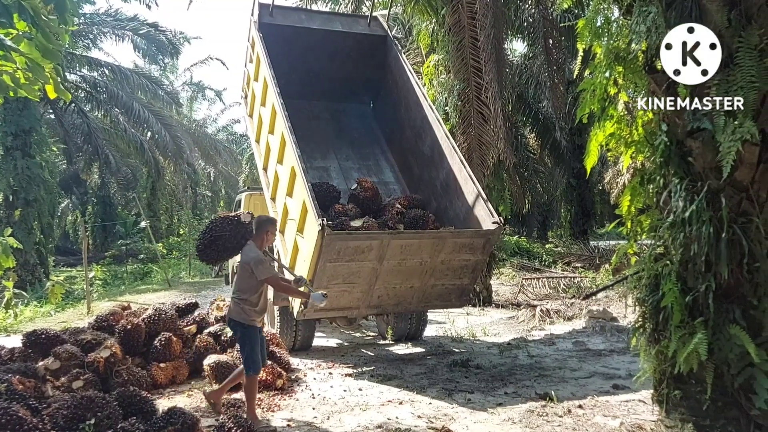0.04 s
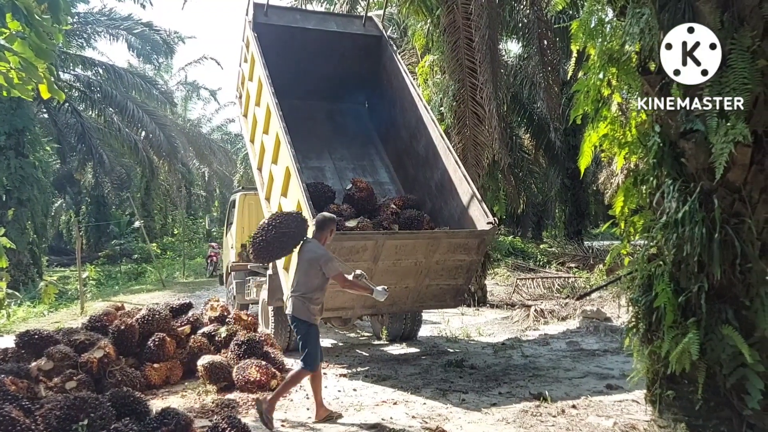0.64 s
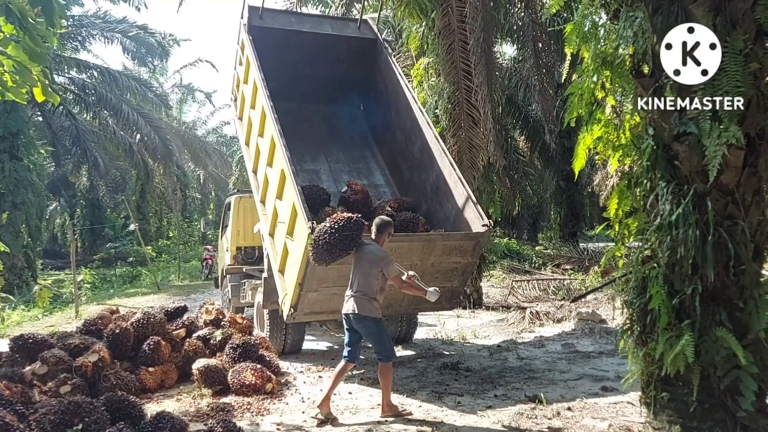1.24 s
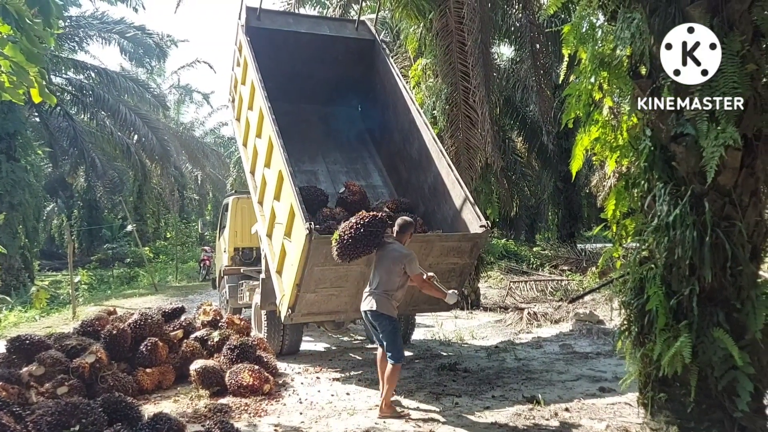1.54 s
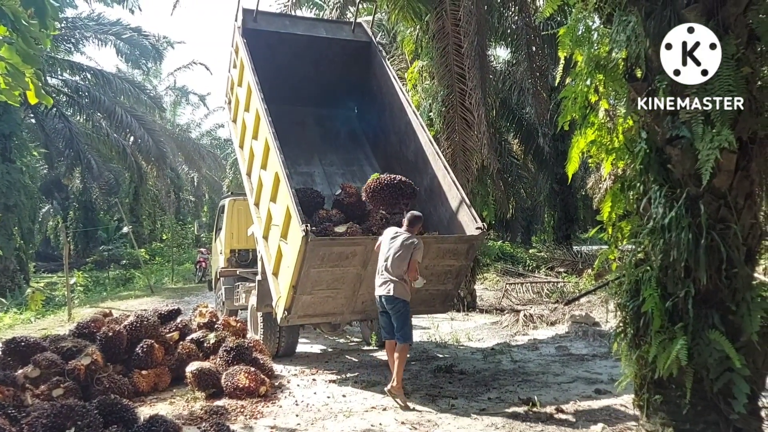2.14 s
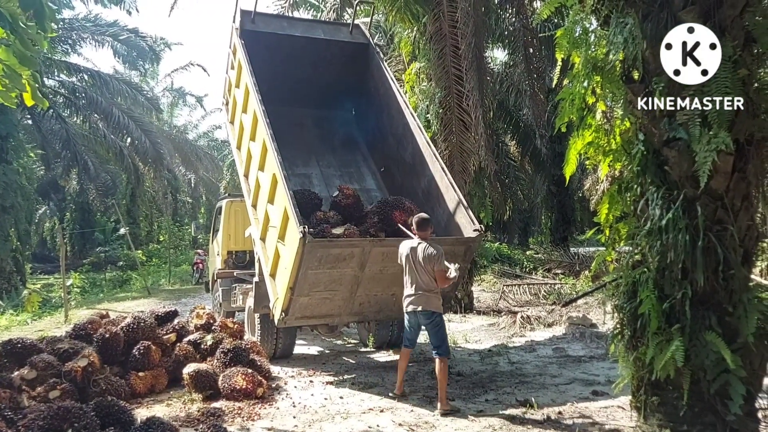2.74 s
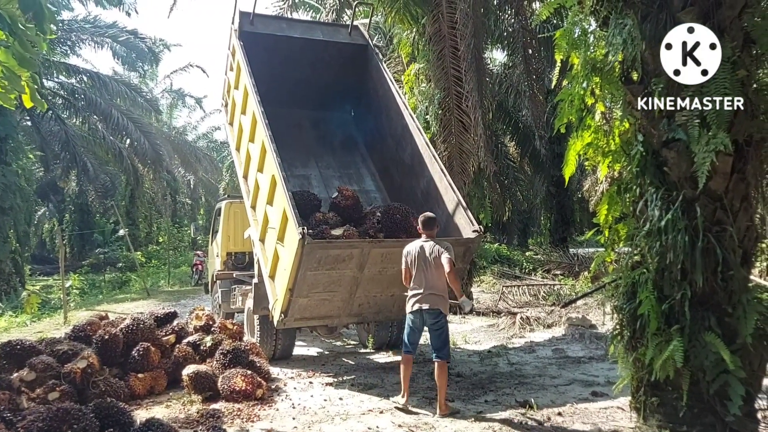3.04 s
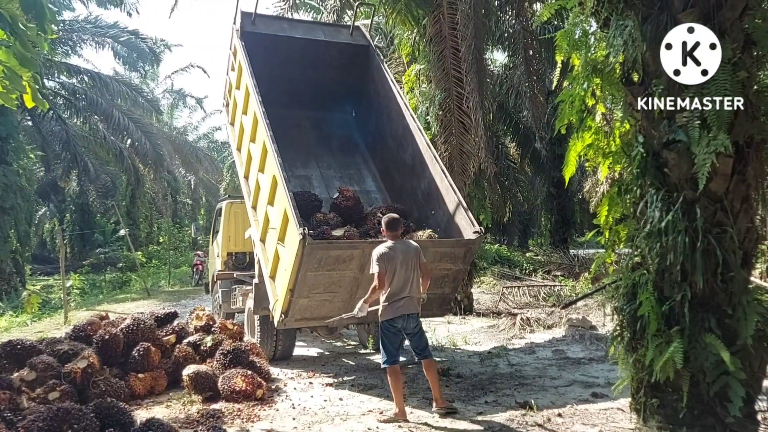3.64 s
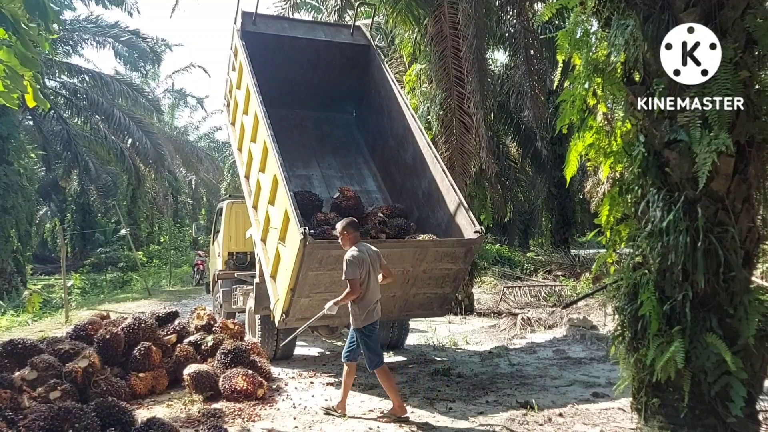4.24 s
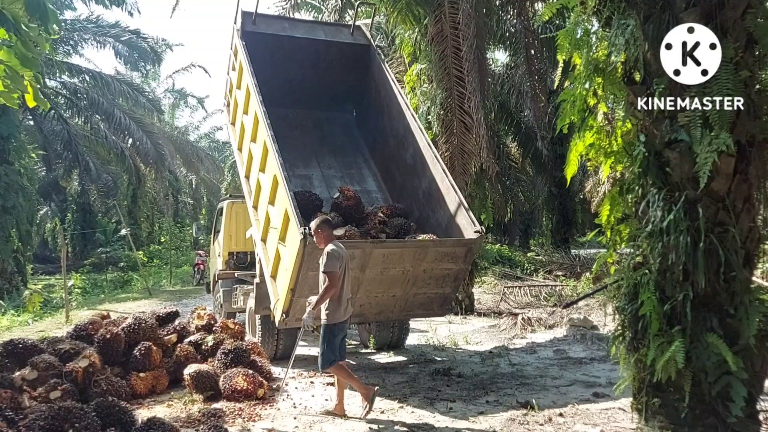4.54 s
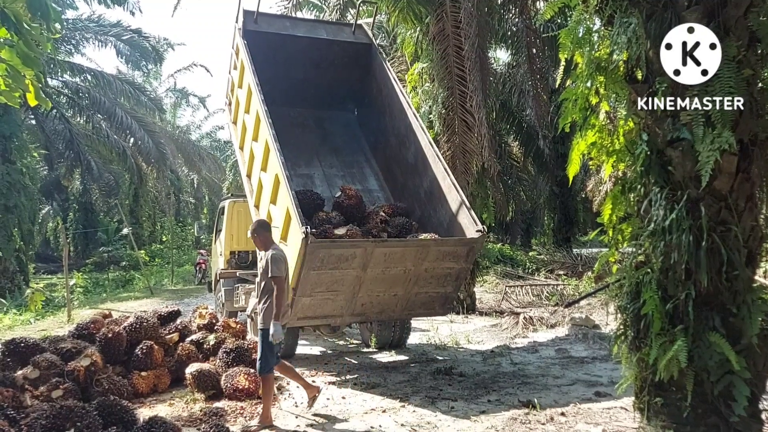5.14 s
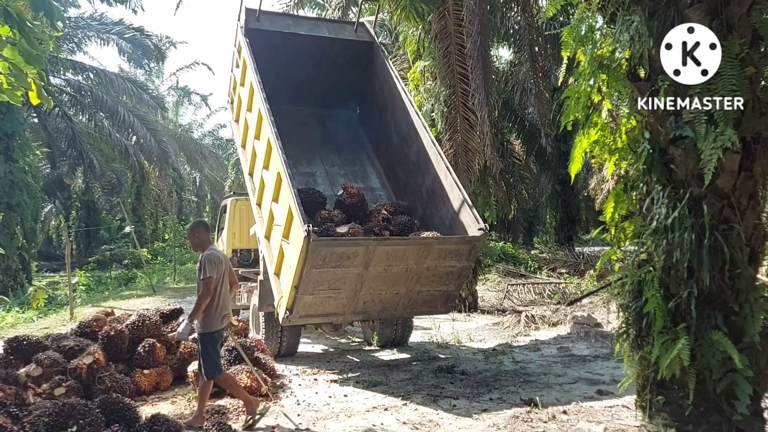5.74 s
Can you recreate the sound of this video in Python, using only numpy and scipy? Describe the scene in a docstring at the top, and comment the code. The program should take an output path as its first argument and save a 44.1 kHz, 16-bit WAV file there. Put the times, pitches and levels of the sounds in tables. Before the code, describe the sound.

A heavy fruit bunch is heaved into a dump truck, thudding dully on the load before crashing onto the steel floor, which booms and rings as it bounces. The crash distorts the microphone and the level dips, then slowly recovers. A thin clink comes afterwards. Throughout, a nearby engine puffs and rattles, easing down to idle, and small birds call faintly in the surrounding grove.

```python
"""In a palm grove a vehicle's engine, off to the left, sinks to idle while small birds call.
Its exhaust puffs through a pipe, its block shakes and clatters, and loose covers buzz.
A heavy, spiny fruit bunch is heaved onto a tipper truck's load, then tumbles onto the steel bed,
which booms and rings; a thin clink follows. The crash overloads the microphone, whose gain
control ducks and slowly recovers."""
import sys
import numpy as np
from scipy import signal
from scipy.fft import rfft, irfft, next_fast_len
from scipy.io import wavfile
from scipy.ndimage import minimum_filter1d, map_coordinates

SR = 44100
rng = np.random.default_rng(int(sys.argv[2]) if len(sys.argv) > 2 else 0)


def output_pcm(signal):
    """Save a mono or channel-first signal as 16-bit PCM at the path in sys.argv[1].

    Samples are clipped to [-1, 1] before scaling.
    """
    pcm = np.clip(np.atleast_2d(signal).T, -1, 1) * 32767
    wavfile.write(sys.argv[1], SR, np.round(pcm).astype(np.int16))


N = 264600


def amp(db):
    return 10 ** (np.asarray(db) / 20)


def unit_rms(x):
    return x / np.sqrt(np.mean(x ** 2) + 1e-20)


def log_interp(points, hz):
    """Interpolate (freq_hz, value) points on a log frequency axis."""
    knots_hz, values = np.transpose(points)
    return np.interp(np.log(hz + 1), np.log(knots_hz + 1), values)


def curve(points):
    """Interpolate (time_s, value) points to one value per sample."""
    return np.interp(np.arange(N) / SR, *np.transpose(points))


def wobble(rate_hz, size=N):
    """Smooth random curve, rate_hz knots a second."""
    knots = rng.standard_normal(int(size * rate_hz / SR) + 4)
    return map_coordinates(knots, [np.arange(size) * rate_hz / SR])


def add(track, start_s, sound):
    """Mix in a sound; a negative start counts back from the track's end."""
    part = track[..., round(start_s * SR):][..., :sound.shape[-1]]
    part += sound[..., :part.shape[-1]]


def filtered(x, response):
    """Apply the frequency response response(hz)."""
    size = next_fast_len(x.shape[-1] + SR // 5)
    return irfft(rfft(x, size) * response(np.fft.rfftfreq(size, 1 / SR)), size)[..., :x.shape[-1]]


def impulse_response(spectrum, size=8192):
    """Minimum-phase response of (freq_hz, level_db) points."""
    cepstrum = irfft(np.log(amp(log_interp(spectrum, np.fft.rfftfreq(size, 1 / SR)))))
    cepstrum[1:size // 2] *= 2
    cepstrum[size // 2 + 1:] = 0
    return irfft(np.exp(rfft(cepstrum)))


def noise(spectrum, coherence, size=N):
    """Coloured stereo noise, rms 1, with the given left-right coherence."""
    def mid_side_gains(hz):
        angle = np.arccos(np.clip(log_interp(coherence, hz), -1, 1)) / 2
        return amp(log_interp(spectrum, hz)) * [np.cos(angle), np.sin(angle)]
    mid, side = filtered(rng.standard_normal((2, size)), mid_side_gains)
    return unit_rms(np.array([mid + side, mid - side]))


def pulses(cycle, scatter_db):
    """One pulse of uneven size per whole cycle."""
    at, train = np.flatnonzero(np.diff(np.floor(cycle))), np.zeros(N)
    train[at] = amp(scatter_db * rng.standard_normal(len(at)))
    return train


# Exhaust pipe response: freq_hz, level_db
PIPE_SPECTRUM = [(28, -39), (50, -0.5), (72, 1), (105, 1), (140, 6), (170, -6), (200, -1), (225, -0.5),
                 (260, -6.5), (310, -0.5), (370, -13.5), (480, -21), (800, -35), (1600, -49.5)]

def exhaust(cycle, revs):
    """Each cycle sends a sharp puff through the pipe, then a rounder one that fades toward idle."""
    second = filtered(pulses(cycle - 0.39, scatter_db=0.5), lambda hz: 1 / (1 + 1j * hz / 200))
    first = pulses(cycle + 0.003 * wobble(20), scatter_db=1.2)
    puffs = -first - second * amp(-3.5 + 10.5 * revs)
    return unit_rms(signal.fftconvolve(puffs, impulse_response(PIPE_SPECTRUM))[:N])


# Engine speed: time_s, cycle_hz
ENGINE_SPEED = [(0, 37.36), (.35, 36.8), (.52, 35.7), (.86, 35.4), (1.03, 34.6), (1.51, 34.2), (1.67, 33.1),
                (2.05, 32.45), (2.5, 30.7), (2.68, 31), (2.77, 30.7), (3.1, 26.4), (3.4, 25.5),
                (4.15, 26.95), (4.8, 27.2), (5.4, 28), (5.59, 27.8), (6, 28.1)]
# Firing strength: time_s, gain_db
ENGINE_EFFORT = [(0, -1.5), (1.3, -2), (1.58, 0), (1.66, -5.5), (1.75, -4.5), (1.82, -1.5), (2.02, 0),
                 (2.45, -2.5), (3.2, 3.5), (3.55, -2), (4.8, -5.5), (5.18, -2.5), (5.45, 1), (6, 0)]
# Engine noise spectra: freq_hz, density_db
RUMBLE_SPECTRUM = [(25, -15), (60, 3), (150, 2), (330, -4), (550, -12.5), (1000, -15), (2000, -37)]
CLATTER_SPECTRUM = [(300, 2.5), (600, 0), (1040, -1), (1400, -1.5), (1750, 1.5), (2400, -0.5), (3200, -3.5),
                    (4100, -2.5), (4900, -9), (6100, -10), (7300, -16), (9900, -12), (12000, -13),
                    (14200, -22.5), (15500, -58)]
# Engine noise, left against right: freq_hz, coherence
ENGINE_COHERENCE = [(100, .998), (400, 0.97), (900, 0.83), (2000, 0.58), (5000, 0.045), (12000, 0.043)]

def engine(resonance_hz=137, half_width_hz=2.5, left_lead_s=0.00049):
    """Exhaust, block shake, pipe drone, rumble and clatter, all in step with the firing cycle."""
    cycle_hz, effort_db = curve(ENGINE_SPEED), curve(ENGINE_EFFORT)
    cycle = np.cumsum(cycle_hz) / SR + 0.47
    revs = (cycle_hz - cycle_hz.min()) / np.ptp(cycle_hz)  # 0 slowest, 1 fastest
    puffs = exhaust(cycle, revs) * amp(-31.5 + 0.4 * revs + effort_db)
    shake = -np.cos(4 * np.pi * cycle) * amp(-59 + 30 * revs + 2.5 * wobble(8.4))
    # At idle the fifth order sits on the pipe's main resonance.
    detuning = (5 * cycle_hz - resonance_hz) / half_width_hz
    drone = -np.cos(10 * np.pi * cycle) * amp(-45.5 + 2.5 * wobble(14)) / np.hypot(1, detuning)
    throb = np.cos(2 * np.pi * cycle)
    rumble = noise(RUMBLE_SPECTRUM, ENGINE_COHERENCE)
    rumble *= amp(-37 + 1.2 * revs + 0.36 * effort_db + 2 * throb)
    clatter = noise(CLATTER_SPECTRUM, ENGINE_COHERENCE)
    clatter *= amp(-44 + 8.5 * revs ** 2.56 + 0.28 * throb + 1.23 * wobble(25.09))
    mix = puffs + shake + drone + rumble + clatter
    advance_s = left_lead_s * np.array([[0.5], [-0.5]])
    return filtered(mix, lambda hz: np.exp(2j * np.pi * hz * advance_s))


# Cover resonances: centre_hz, width_hz, exciting_cycle_hz, cycle_range_hz, level_db
COVER_BUZZES = [(1640, 170, 34, 0.28, -49), (2340, 100, 36.3, 1.1, -48.5), (2580, 220, 34.45, .35, -57),
                (1860, 370, 32.3, .8, -48), (4200, 170, 37.4, 3, -55), (5150, 70, 36, 1.8, -60.5),
                (6270, 73, 36.3, 2.4, -61)]

def covers():
    """Loose engine covers buzz in narrow bands, each near its own engine speed."""
    out, cycle_hz = np.zeros((2, N)), curve(ENGINE_SPEED)
    for centre_hz, width_hz, exciting_cycle_hz, cycle_range_hz, level_db in COVER_BUZZES:
        white = rng.standard_normal((2, N))
        band = unit_rms(filtered(white, lambda hz: 1 / (1 + (2 * (hz - centre_hz) / width_hz) ** 2)))
        excitation = np.exp(-((cycle_hz - exciting_cycle_hz) / cycle_range_hz) ** 2)
        out += band * excitation * amp(level_db + 1.9 * wobble(11.9))
    return out


def note(length_s, pitches_hz):
    """A bird's pure tone swells and fades, bending through evenly timed pitches."""
    progress = np.linspace(0, 1, int(length_s * SR))
    bend = np.polyfit(np.linspace(0, 1, len(pitches_hz)), pitches_hz, len(pitches_hz) - 1)
    hz = np.polyval(bend, progress) * (1 + 0.005 * wobble(161)[:len(progress)])
    return np.sqrt(2 * np.abs(np.sin(np.pi * progress))) * np.sin(2 * np.pi * np.cumsum(hz) / SR)


def grove(x, t60_s, wet_db):
    """A mono sound plus its stereo scatter from the palm trunks."""
    t = np.arange(SR) / SR
    tail = rng.standard_normal((2, SR)) * amp(-60 * t / t60_s) * (1 - np.exp(-t / 0.0087))
    tail /= np.linalg.norm(tail[0])
    return x + amp(wet_db) * signal.fftconvolve(x[None], tail, axes=1)[:, :N]


# Far flock: start_s, end_s, pitch_hz, level_db
BIRD_FLOCK = (-0.7, 1.0, 3926, -48)
# Falling chirps: start_s, length_s, start_hz, level_db
BIRD_CHIRPS = [(.965, 0.023, 4300, -46.5), (3.069, 0.021, 4420, -46), (3.434, 0.03, 4410, -48),
               (4.326, 0.025, 3987, -45), (4.645, 0.027, 5150, -42.5), (5.007, 0.023, 4380, -37.5),
               (5.353, 0.037, 4900, -39), (5.797, 0.018, 4400, -40.5)]
# Arched calls: start_s, length_s, top_hz, level_db
BIRD_ARCHES = [(1.46, .11, 4270, -54), (4.49, .095, 4400, -53), (4.812, .095, 4500, -52),
               (5.09, .11, 4560, -54), (5.49, .1, 4500, -56)]
# Thin whistles: start_s, length_s, start_hz, middle_hz, end_hz, level_db
BIRD_WHISTLES = [(2.5, 0.25, 3620, 3765, 3890, -52), (3.37, 0.083, 4380, 4120, 4050, -57),
                 (4.24, .1, 3810, 3880, 3822, -53), (4.458, 0.12, 6350, 6320, 6310, -56),
                 (5.215, 0.1, 3950, 3900, 3720, -54), (5.528, 0.06, 3920, 4020, 3960, -51),
                 (5.83, 0.06, 4130, 4330, 4330, -51), (5.915, .08, 4300, 4390, 4330, -55)]

def birds(end_hz=3340, drop_s=0.04):
    """Distant twitters, quick chirps, arched calls that end in a drop, and whistles."""
    song = np.zeros(N)
    start_s, end_s, pitch_hz, level_db = BIRD_FLOCK
    for when, pitch, softness in rng.random((14, 3)):
        glide_hz = pitch_hz * (0.95 + 0.1 * pitch) * np.array([1.02, 1.01, 0.96])
        twitter = amp(level_db - 6 * softness) * note(0.05, glide_hz)
        add(song, start_s + (end_s - start_s) * np.sqrt(when), twitter)
    for start_s, length_s, start_hz, level_db in BIRD_CHIRPS:
        chirp = note(length_s, [start_hz, end_hz + 0.37 * (start_hz - end_hz), end_hz])
        accent = np.exp(-((np.linspace(0, 1, len(chirp)) - 0.58) / 0.24) ** 2)
        add(song, start_s, chirp * amp(level_db - 10 * (1 - accent) + 3.1 * wobble(200, len(chirp))))
    for start_s, length_s, top_hz, level_db in BIRD_ARCHES:
        add(song, start_s, amp(level_db) * note(length_s, [0.96 * top_hz, top_hz, 0.95 * top_hz]))
        drop = note(drop_s, [0.97 * top_hz, 0.85 * top_hz, end_hz])
        add(song, start_s + length_s - drop_s / 2, amp(level_db + 2) * drop)
    for start_s, length_s, *pitches_hz, level_db in BIRD_WHISTLES:
        add(song, start_s, amp(level_db) * note(length_s, pitches_hz))
    return grove(song, t60_s=0.4, wet_db=-4)


# Dry knocks: start_s, level_db, cushion_hz
KNOCK_HITS = [(1.628, -48, 1500), (2.748, -29, 580), (2.795, -33.5, 660), (3.646, -14.5, 1490)]
# Their shared ring: pitch_hz, gain_db, t60_s
KNOCK_MODES = [(530, -2, 0.24), (614, 5, 0.13), (732, -10, 0.14), (908, 1.5, 0.17), (1003, -6, 0.083)]

def knocks():
    """One faint knock, two cushioned ones on the load and a hard one as the bunch falls."""
    out, t = np.zeros((2, N)), np.arange(6 * SR // 5) / SR
    for start_s, level_db, cushion_hz in KNOCK_HITS:
        ring = np.zeros(len(t))
        for pitch_hz, gain_db, t60_s in KNOCK_MODES:
            envelope = amp(gain_db - 60 * t / t60_s) / np.hypot(1, (pitch_hz / cushion_hz) ** 2)
            ring += envelope * np.sin(2 * np.pi * (pitch_hz * t + rng.random()))
        add(out, start_s, amp(level_db) * ring * (1 - np.exp(-t / 0.0016)))
    return out


# Brushes of the spines: start_s, length_s, level_db
SPINE_BRUSHES = [(2.69, 0.096, -35.5), (2.893, 0.063, -45), (3.137, 0.14, -52), (3.518, 0.16, -48.5)]
# Their spectrum: freq_hz, density_db
SPINE_SPECTRUM = [(2000, -2), (5000, -19), (10000, -10), (13000, -10), (15500, -19)]
# Noise from the truck bed, left against right: freq_hz, coherence
BED_COHERENCE = [(60, 0.9), (200, 0.99), (400, 0.92), (700, 0.87), (1300, 0.65), (2400, 0.27), (4400, 0.32),
                 (8000, 0)]

def rustle():
    """Dry spines brush one another as the bunch shifts on the load."""
    out = np.zeros((2, N))
    for start_s, length_s, level_db in SPINE_BRUSHES:
        size = int(length_s * SR)
        brush = noise(SPINE_SPECTRUM, BED_COHERENCE, size) * np.hanning(size)
        add(out, start_s, brush * amp(level_db + 2.6 * wobble(324, size)))
    return out


# Main modes of the steel bed: pitch_hz, gain_db, t60_s
BED_MODES = [(47, 4, 0.17), (64.5, -8, 1.34), (129.6, -9.5, 1.68), (163.7, -10, 0.28), (205.5, -21.5, 1.8),
             (307.4, -14, 1.72), (333.3, -17.5, 1.6), (382, -14, 1.47), (431, -16.5, 1.4), (588, -12, .62),
             (656, -17, .5), (761, -21.5, 0.69), (996, -11.5, 0.23), (1219, -1, 0.082), (1632, -11, 0.27),
             (2045, -10, .18), (2690, -1, 0.1)]

def boom(t, corner_hz, t60_scale, wander_hz=4.5, flutter_db=2, knot_s=0.03):
    """The soft bunch drives the bed's modes; the shifting load bends their pitch and level."""
    mode_hz, gain_db, t60_s = np.transpose(BED_MODES)[:, :, None]
    strength = amp(gain_db + 2 * rng.standard_normal(mode_hz.shape)) / np.hypot(1, mode_hz / corner_hz)
    knots_s = np.arange(0, t[-1] + knot_s, knot_s)
    drift, flutter = (np.array([np.interp(t, knots_s, row) for row in rows])
                      for rows in rng.standard_normal((2, len(mode_hz), len(knots_s))))
    pitch_hz = mode_hz + wander_hz * np.minimum(mode_hz / 300, 1) * drift
    envelope = strength * amp(flutter_db * flutter - 60 * t / (t60_s * t60_scale))
    modes = envelope * np.sin(2 * np.pi * np.cumsum(pitch_hz, axis=1) / SR)
    return modes.sum(axis=0) * (1 - np.exp(-t / 0.0095))


# Panel spectrum: freq_hz, density_db
PANEL_SPECTRUM = [(40, -11.5), (100, 3.5), (200, 0), (400, -2.5), (650, -2.5), (1000, -5.5), (1600, -7.5),
                  (3000, -19.5), (5000, -21.5), (9000, -31), (15000, -37)]
# Panel decay: freq_hz, t60_s
PANEL_DECAY = [(80, 2.47), (350, 1.35), (700, 0.82), (1500, 0.44), (4000, 0.72), (12000, 0.51)]

def clang(t, t60_scale):
    """Crowded panel modes ring as noise, each frequency fading at its own rate."""
    hz, frame_s, bands = signal.stft(noise(PANEL_SPECTRUM, BED_COHERENCE, len(t)), SR, nperseg=256)
    t60_s = t60_scale * log_interp(PANEL_DECAY, hz)[:, None]
    _, ring = signal.istft(bands * amp(-60 * frame_s / t60_s), SR, nperseg=256)
    return ring[:, :len(t)] * (1 - np.exp(-t / 0.0014))


# Crushed husk: freq_hz, density_db
HUSK_SPECTRUM = [(300, -30), (900, -1.5), (2000, -7.5), (2700, -2), (3200, -3.5), (4500, -1), (6500, -7.5),
                 (9000, -18), (12000, -19), (15000, -32.5)]

def crunch(snaps_per_s=900, t60_s=0.19):
    """Spines snap in clumps over the hiss of crushed fibre, a little to the right."""
    size = SR // 4
    t = np.arange(size) / SR
    clicks = rng.standard_normal((2, size)) * (rng.random(size) < snaps_per_s / SR)
    snaps = unit_rms(filtered(clicks, lambda hz: amp(log_interp(HUSK_SPECTRUM, hz))))
    hiss = noise(HUSK_SPECTRUM, BED_COHERENCE, size)
    envelope = amp(-60 * t / t60_s + 1.6 * wobble(266, size)) * (1 - np.exp(-t / 0.0041))
    return np.sqrt(0.5) * (snaps + hiss) * envelope * amp([[-2], [2]])


# Contacts of the bunch: start_s, thump_hz, thump_db, boom_db, clang_db, crunch_db
BUNCH_CONTACTS = [(2.719, 149, -28, -47, -30, -35), (2.743, 135, -10.5, -18.5, -29, -36),
                  (2.772, 166, -21, -22, -32.5, -41), (2.808, 82.6, -8.5, -17, -39, -60),
                  (2.85, 139, -20, -16, -36.5, -58), (3.643, 64, 6, -7.5, -12.5, -29),
                  (3.673, 72, 7.5, -3, -7.5, -6), (3.699, 106, -1.5, -8.5, -16, -27),
                  (3.727, 113, -4, -11.5, -21, -42), (3.846, 122, -7, -18, -35, -52),
                  (3.894, 131.4, -5.5, -23, -37, -60), (4.021, 109, -7, -7, -37, -38.5),
                  (4.057, 75, -3.5, -6, -43.5, -73), (4.14, 122, -14, -19, -50, -74),
                  (4.22, 123, -10, -18, -46.5, -76)]

def bunch(on_steel_s=3.66, thump_t60_s=0.14, thump_rise_s=0.0064):
    """Each contact thumps the floor, rings the bed and its panels and crushes the husk."""
    out, t = np.zeros((2, N)), np.arange(6 * SR // 5) / SR
    thump_envelope = amp(-60 * t / thump_t60_s) * (1 - np.exp(-t / thump_rise_s))
    for start_s, thump_hz, thump_db, boom_db, clang_db, crunch_db in BUNCH_CONTACTS:
        # The load cushions the blow and shortens the ring; dull contacts miss the high modes.
        corner_hz, t60_scale = (483, 0.62) if start_s < on_steel_s else (2530, 1)
        corner_hz *= amp(min(clang_db - boom_db, 0))
        add(out, start_s, -amp(thump_db) * thump_envelope * np.sin(2 * np.pi * thump_hz * t))
        add(out, start_s, amp(boom_db) * boom(t, corner_hz, t60_scale))
        add(out, start_s, amp(clang_db) * clang(t, t60_scale))
        add(out, start_s, amp(crunch_db) * crunch())
    return out


# Metal resonances: centre_hz, width_hz, gain_db
CLINK_MODES = [(4350, 650, -7), (7100, 260, 2), (11130, 240, 2), (13240, 780, -5)]

def clink(start_s=4.718, t60_s=0.096):
    """A short scrape rings thin metal resonances, as of a steel loading spike."""
    def response(hz):
        return sum((-1) ** k * amp(gain_db) * 1j * hz * width_hz
                   / (centre_hz ** 2 - hz ** 2 + 1j * hz * width_hz)
                   for k, (centre_hz, width_hz, gain_db) in enumerate(CLINK_MODES))
    out, t = np.zeros((2, N)), np.arange(SR // 4) / SR
    scrape = unit_rms(filtered(rng.standard_normal((2, len(t))), response))
    add(out, start_s, scrape * amp(-26.5 - 60 * t / t60_s) * (1 - np.exp(-t / 0.0083)))
    return out


def scene():
    return engine() + covers() + bunch() + knocks() + rustle() + birds() + clink()


def gain_control(x, threshold_db, max_cut_db, smooth_s, hold_s, recovery_db_per_s):
    """Loud sound pulls the gain down; it holds, then climbs back."""
    window = 2 * int(hold_s * SR / 2) + 1
    peak_db = 20 * np.log10(np.abs(x).max(axis=0) + 1e-9)
    needed_db = np.clip(threshold_db - peak_db, -max_cut_db, 0)
    held_db = minimum_filter1d(needed_db, window, origin=window // 2)
    ramp_db = recovery_db_per_s * np.arange(N) / SR
    gain_db = np.minimum.accumulate(held_db - ramp_db) + ramp_db
    step = 1 / (smooth_s * SR)
    return x * amp(signal.lfilter([step], [1, step - 1], gain_db))


def record(dry):
    """Bass cut, gain control, soft overload and band limit."""
    low_hz, top_hz = 38.0, 15700
    x = filtered(dry, lambda hz: hz ** 4 / np.sqrt(hz ** 8 + low_hz ** 8))
    x = gain_control(x, threshold_db=-11.5, max_cut_db=9.5, smooth_s=0.33, hold_s=0.73,
                     recovery_db_per_s=3.5)
    clipped = x / (1 + np.abs(x) ** 8) ** (1 / 8)
    return filtered(clipped, lambda hz: hz < top_hz)


dry = scene()
out = record(dry)
output_pcm(out)
```